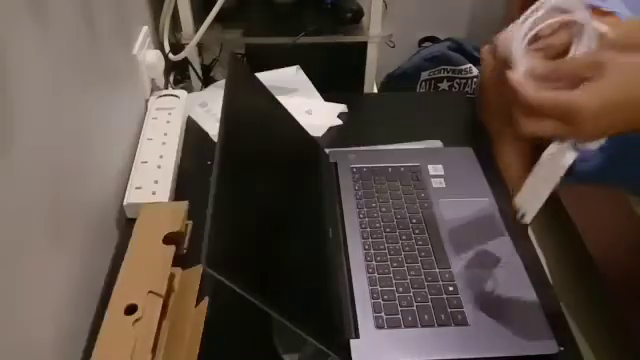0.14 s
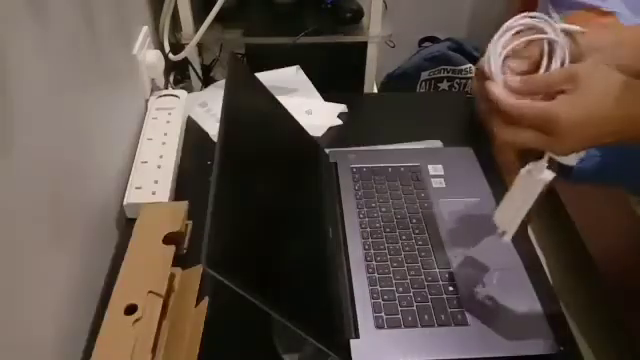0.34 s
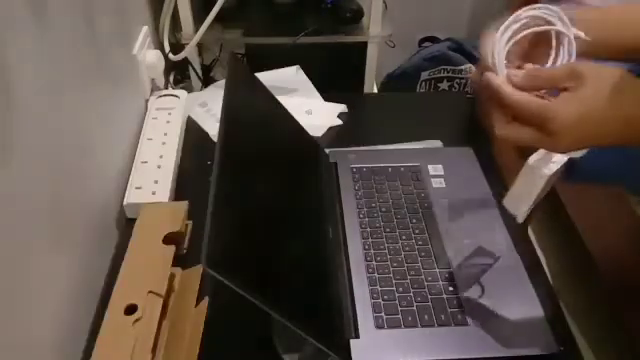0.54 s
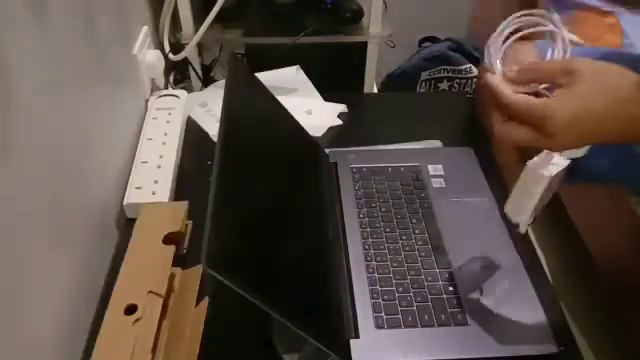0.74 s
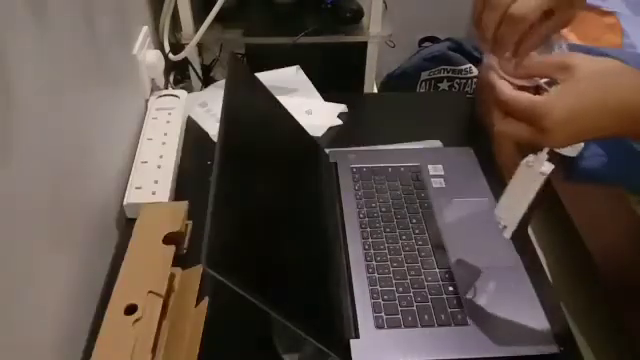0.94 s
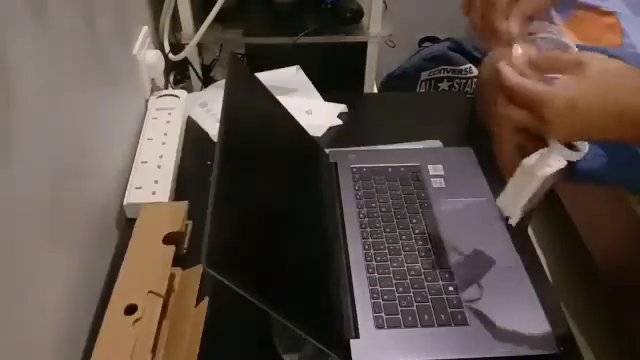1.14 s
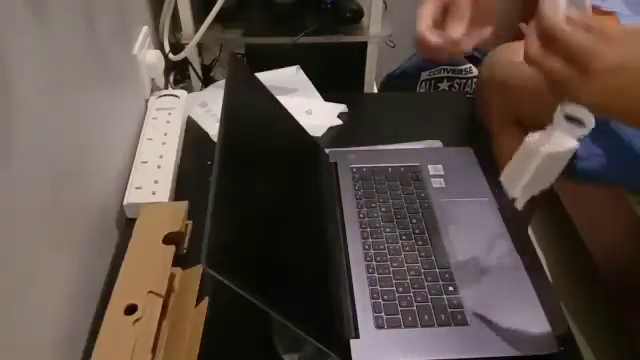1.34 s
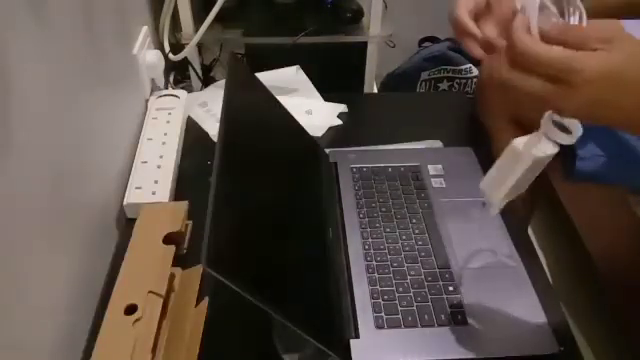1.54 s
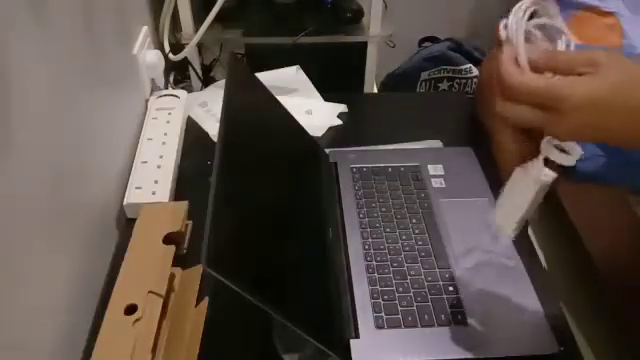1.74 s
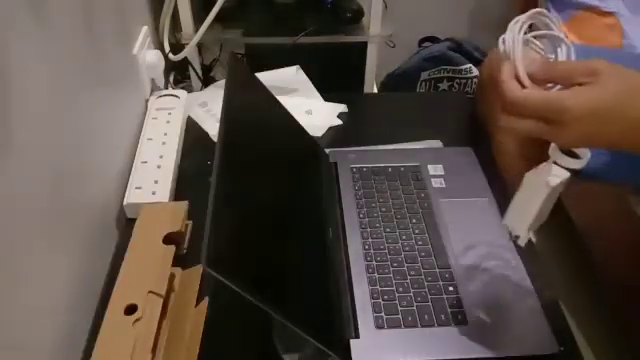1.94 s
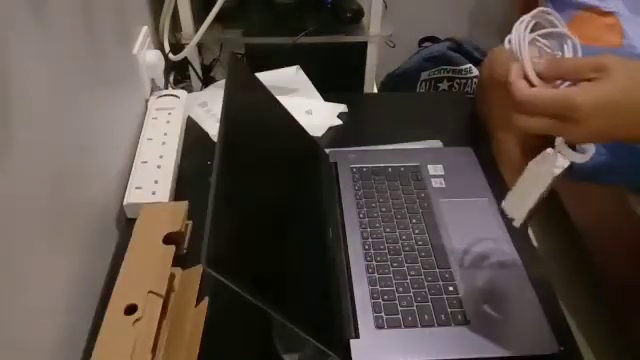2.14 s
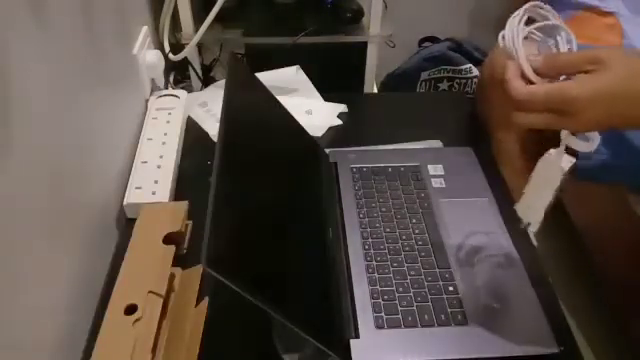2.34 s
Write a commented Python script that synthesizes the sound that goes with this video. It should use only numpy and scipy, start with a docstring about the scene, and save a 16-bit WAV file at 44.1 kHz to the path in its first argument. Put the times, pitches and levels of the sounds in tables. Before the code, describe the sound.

Plastic cord being unwrapped by hand, crackling in short bursts over a faint fan hum.

```python
"""Unwrapping a plastic cord

Hands uncoil a cord in a small room, close to a phone. Its strap and sheath crackle in short bursts of
tiny clicks, with one longer rip as the strap slips. Fingers rustle along the sheath and the charger's
case bumps and rings softly. A fan hums underneath."""
import sys
import numpy as np
from scipy import signal
from scipy.fft import rfft, irfft, next_fast_len
from scipy.io import wavfile
from scipy.ndimage import uniform_filter1d

SR = 44100
rng = np.random.default_rng(int(sys.argv[2]) if len(sys.argv) > 2 else 0)


def unload_audio(sound):
    """Save the sound as a 16-bit wav file, at the path given as the first command line argument."""
    columns = np.transpose(np.atleast_2d(sound))
    # keep every value between -1 and 1, then stretch to whole-number steps
    steps = np.round(np.clip(columns, -1, 1) * 32767)
    wavfile.write(sys.argv[1], SR, steps.astype(np.int16))


N = 110250
FFT_SIZE = next_fast_len(2 * N)
HZ = np.arange(FFT_SIZE // 2 + 1) * SR / FFT_SIZE

# The cord's four EQ bands, low to top: (centre [Hz]) and (width [Hz])
BAND_HZ = [1300, 3300, 6400, 11500]
BAND_WIDTH_HZ = [1500, 2600, 3700, 7300]
# Crackles of strap and sheath: (time [s], relative level [dB], decay time [s],
# opening click against the swarm [dB], four band levels [dB])
CRACKLES = [(0.06, -37.0, 0.0019, -14.0, -17.0, -16.0, -3.0, -4.0),
            (0.2105, -7.8, 0.0016, -4.0, -29.0, -19.0, -6.0, -2.0),
            (0.2195, -4.4, 0.0016, -8.0, -27.0, -18.0, -2.0, -6.0),
            (0.2248, 0.3, 0.0016, -6.0, -32.0, -16.0, -1.0, -8.0),
            (0.2303, -15.6, 0.0012, -20.0, -12.0, -10.0, -3.0, -4.0),
            (0.3992, -1.7, 0.0016, -11.0, -33.0, -23.0, -8.0, -1.0),
            (0.407, -4.8, 0.0022, -20.0, -30.0, -21.0, -6.0, -1.0),
            (0.4183, -12.9, 0.0024, -20.0, -32.0, -17.0, -2.0, -4.0),
            (0.4463, 2.5, 0.0018, -7.0, -19.0, -10.0, -5.0, -3.0),
            (0.4515, 0.5, 0.0015, -17.0, -22.0, -12.0, -8.0, -1.0),
            (0.4549, 1.0, 0.0011, -20.0, -27.0, -10.0, -14.0, -1.0),
            (0.4586, -2.3, 0.0023, -13.0, -30.0, -14.0, -4.0, -3.0),
            (0.4692, -0.6, 0.0017, -12.0, -30.0, -18.0, -9.0, -1.0),
            (0.4815, -10.1, 0.0017, -19.0, -31.0, -17.0, -4.0, -2.0),
            (0.4918, -6.4, 0.0016, -20.0, -38.0, -15.0, -8.0, -1.0),
            (0.5786, -19.0, 0.0007, 0.0, -34.0, -1.0, -9.0, -18.0),
            (0.5905, -13.0, 0.0008, -2.0, -30.0, -7.0, -3.0, -6.0),
            (0.6022, -17.6, 0.0016, -6.0, -27.0, -4.0, -5.0, -5.0),
            (0.6121, -4.0, 0.0013, -18.0, -32.0, -16.0, -1.0, -7.0),
            (0.6154, -7.0, 0.0011, -6.0, -18.0, -7.0, -1.0, -13.0),
            (0.6202, 0.0, 0.0013, -2.0, -6.0, -4.0, -5.0, -14.0),
            (0.6314, -8.9, 0.0025, -16.0, -16.0, -2.0, -5.0, -13.0),
            (0.8436, -14.2, 0.0016, -9.0, -40.0, -17.0, -1.0, -9.0),
            (1.0869, -2.5, 0.0013, -6.0, -25.0, -1.0, -9.0, -11.0),
            (1.0985, -16.4, 0.0013, -9.0, -14.0, -1.0, -9.0, -10.0),
            (1.2117, -14.0, 0.0008, 0.0, -8.0, -2.0, -11.0, -9.0),
            (1.2487, -12.0, 0.002, -14.0, -6.0, -3.0, -10.0, -7.0),
            (1.3049, -21.9, 0.0032, -11.0, -9.0, -4.0, -5.0, -8.0),
            (1.3441, -12.1, 0.0015, -7.0, -15.0, -2.0, -6.0, -13.0),
            (1.3578, -17.8, 0.0029, -16.0, -10.0, -2.0, -8.0, -7.0),
            (1.3683, -12.1, 0.0012, -7.0, -20.0, -4.0, -3.0, -10.0),
            (1.3704, -5.7, 0.0015, -13.0, -7.0, -15.0, -10.0, -2.0),
            (1.3775, -13.5, 0.0035, -15.0, -20.0, -5.0, -3.0, -10.0),
            (1.3839, -15.5, 0.0023, -8.0, -8.0, -8.0, -5.0, -4.0),
            (1.4378, -20.8, 0.0024, -16.0, -7.0, -7.0, -4.0, -8.0),
            (1.4563, -26.1, 0.0023, -13.0, -14.0, -6.0, -3.0, -7.0),
            (1.6731, -22.4, 0.0022, -20.0, -21.0, -6.0, -2.0, -15.0),
            (1.6853, -21.5, 0.0019, -16.0, -11.0, -2.0, -6.0, -18.0),
            (1.6969, -20.0, 0.0015, -11.0, -27.0, -6.0, -3.0, -7.0),
            (1.7572, -34.0, 0.0031, -11.0, -20.0, -5.0, -2.0, -17.0),
            (1.8009, -31.0, 0.0027, -11.0, -31.0, -2.0, -6.0, -8.0),
            (1.8403, -33.2, 0.0033, -20.0, -16.0, -9.0, -1.0, -17.0),
            (1.9015, -38.4, 0.0024, -17.0, -9.0, -9.0, -9.0, -2.0),
            (1.9417, -35.0, 0.002, -16.0, -12.0, -2.0, -9.0, -9.0),
            (2.1319, -36.0, 0.0018, -7.0, -13.0, -9.0, -2.0, -9.0),
            (2.1511, -30.1, 0.0025, -20.0, -12.0, -23.0, 0.0, -22.0),
            (2.1626, -25.3, 0.0027, -20.0, -5.0, -5.0, -6.0, -14.0),
            (2.1760, -27.0, 0.0018, -11.0, -19.0, -7.0, -1.0, -12.0),
            (2.1859, -17.5, 0.0024, -18.0, -12.0, -9.0, -2.0, -9.0),
            (2.2127, -15.9, 0.0026, -13.0, -17.0, -12.0, 0.0, -18.0),
            (2.2198, -21.3, 0.0023, -11.0, -4.0, -4.0, -8.0, -15.0),
            (2.2636, -22.7, 0.0033, -20.0, -17.0, -12.0, -2.0, -5.0),
            (2.2703, -17.1, 0.0022, -18.0, -21.0, -12.0, -1.0, -12.0),
            (2.4398, -22.2, 0.002, -16.0, -15.0, -12.0, -1.0, -8.0),
            (2.4957, -26.2, 0.0025, -12.0, -15.0, -1.0, -8.0, -18.0)]
# Strap rip: (time [s], length [s], opening gain [dB], peak gain [dB], closing gain [dB], slip rate [1/s])
RIPS = [(0.2393, .0305, -1, 5, 3.5, 800)]
# Tone of the rip, low to top: (band level [dB])
RIP_BANDS_DB = [-33.5, -17.5, -11.5, -10]
# Finger strokes along the cord: (time [s], length [s], relative level [dB], four band levels [dB])
STROKES = [(0.589, 0.015, -47, -7, -21, 1, -1), (0.651, 0.052, -56.5, -2, -7, -23, 5),
           (1.258, 0.23, -56.5, 5, 0, -26, -27), (1.348, 0.068, -49, -3, -3.5, -18, -4),
           (1.663, 0.022, -53.5, -5.5, -18, -9.5, -15), (1.696, 0.036, -58.5, -23, 3.5, -1, -18),
           (1.75, 0.039, -56, -26, -8, 3, -24), (1.777, 0.023, -60, -21, -14, 7, -7),
           (1.796, 0.016, -76, -27, 4.5, -22, -14), (1.891, 0.045, -82, -32, -13, -1, -4),
           (1.941, 0.044, -63.5, -26.5, -8, -3.5, -3), (1.97, 0.098, -70, -15, -6.5, -5, -17),
           (2.111, 0.024, -64.5, -11, -11, -0.5, -21), (2.137, 0.043, -54.5, -5, -16, -10, -34),
           (2.172, 0.039, -45.5, -6.5, -9, -2, -11), (2.202, 0.046, -49.5, 2.5, -1, -22, -15),
           (2.23, 0.067, -64, 11.5, -21, -28, -8), (2.431, 0.059, -58.5, -40, -16, 0, -7)]
# Tone of the plastic and the microphone: (frequency [Hz], gain [dB])
CORD_EQ = [(150, -60), (400, -32), (650, -23), (900, -8.5), (1500, -1.5), (2600, 1.5), (3300, 0.5),
           (4200, 2.5), (5200, 4.5), (6000, 2), (6800, 5), (7700, 2.5), (8300, -2), (10000, 4.5),
           (12000, -1.5), (13800, -2), (15000, 6.5), (16000, -14)]
# Bumps, hollow rings and small scrapes of the charger's case:
# (time [s], relative level [dB], pitch [Hz], bandwidth [Hz], T60 of the fade [s])
BUMPS = [(0.099, -53.5, 259, 81, 0.24), (.24, -48.5, 705, 197, 0.2), (.446, -39, 1637, 304, 0.092),
         (0.619, -43, 1251, 90, 0.37), (.622, -43, 2210, 298, 0.29), (.625, -41, 3230, 300, 0.28),
         (0.629, -51, 962, 120, .3), (0.619, -46, 1760, 150, 0.11), (0.941, -52.5, 264, 60.6, 0.16),
         (1.25, -48.5, 2200, 200, 0.22), (1.351, -49, 1245, 118, 0.52), (1.25, -55, 968, 148.8, 0.21),
         (1.366, -47, 485, 122, 0.27), (1.431, -55, 455, 103.1, 0.2), (1.679, -55, 404, 255, 0.13),
         (1.754, -58, 4530, 198, 0.21), (1.752, -56, 6470, 500, 0.2), (1.8, -58, 3380, 200, 0.16),
         (1.799, -60, 2630, 200, 0.14), (2.158, -57, 1248, 88.5, 1), (2.098, -59.5, 439, 81.5, 0.21),
         (2.207, -47, 500, 633, 0.41), (2.208, -49.5, 234, 44.6, 0.19), (2.231, -42, 227, 94, 0.23),
         (2.238, -41, 107.5, 25, 0.18), (2.438, -61.5, 1530, 99.6, 0.22), (2.438, -63, 3330, 150, 0.48)]
# Decay of the small room: (frequency [Hz], T60 [s])
ROOM_T60 = [(500, 0.27), (2000, 0.27), (5500, 0.33), (9000, 0.28), (15000, 0.25)]
# Tone of the fan: (frequency [Hz], relative level [dB])
FAN_SPECTRUM = [(25, -29), (45, -15), (68, -20.5), (85, 4), (125, 3), (155, -7.5), (260, -9.5),
                (400, -12.5), (700, -17), (1100, -19.5), (1200, -15), (1260, -5), (1330, -18), (1800, -23),
                (3000, -27), (5000, -32.5), (8000, -37.5), (13600, -39.5), (15000, -41.5), (16000, -48.5)]
# Tone of the faint stereo hiss: (frequency [Hz], relative level [dB])
HISS_SPECTRUM = [(25, 6.5), (60, -16), (140, -3), (400, -1.5), (1100, -5), (1260, 6.5), (1400, -4.5),
                 (2500, -8.5), (8000, -21), (16000, -26)]

CRACKLE_CLICKS_PER_S, CRACKLE_TRIM_DB = 12000, -1
SLIP_JITTER, SLIP_SCATTER_DB, RIP_HISS_DB, RIP_PEAK_AT = .2, 1.5, -20, .83
STRAP_RING_HZ, STRAP_RING_WIDTH_HZ, STRAP_RING_DB = 6850, 4100, -7
RUSTLE_CLICKS_PER_S, RUSTLE_WAVER_DB, RUSTLE_SPILL_DB = 15000, 3.5, -12
ROOM_DB, ROOM_RISE_S = -4, .0025
FAN_DB, FAN_FLICKER_DB, FAN_FLICKER_HZ, HISS_DB = -58, 2.5, 9, -72.5


def crackles():
    """The plastic gives with one click; a swarm of tiny ones swells and dies away behind it."""
    out, t = np.zeros(N), np.arange(1000) / SR
    for start, db, decay, opening_db, *band_db in CRACKLES:
        swarm = clicks(CRACKLE_CLICKS_PER_S, scatter_db=-1.5, samples=len(t))
        fade = np.exp(-t / decay)
        swarm *= (1 - fade) * fade
        swarm /= np.sqrt(np.sum(swarm ** 2) + 1e-18)
        swarm[0] = undb(opening_db)
        mix_in(out, start, swarm * undb(db + CRACKLE_TRIM_DB), band_db)
    return out


def strap_rip():
    """Nearly regular slips build up and ring the strap, over a hiss of finer tearing."""
    out = np.zeros(N)
    resonance = signal.iirpeak(STRAP_RING_HZ, STRAP_RING_HZ / STRAP_RING_WIDTH_HZ, fs=SR)
    for start, length, first_db, peak_db, last_db, rate in RIPS:
        timing, strength = rng.standard_normal((100, 2)).T
        slip_times = np.cumsum(np.exp(SLIP_JITTER * timing)) / rate
        slip_times -= slip_times[0]
        inside = slip_times < length
        n = int(length * SR) + 1
        rip = undb(RIP_HISS_DB) * rng.standard_normal(SR // 4)[:n]
        rip[(slip_times[inside] * SR).astype(int)] += undb(SLIP_SCATTER_DB * strength[inside])
        rip *= undb(np.interp(np.arange(n) / n, [0, RIP_PEAK_AT, 1], [first_db, peak_db, last_db]))
        ring = signal.lfilter(*resonance, rip)
        mix_in(out, start, rip + undb(STRAP_RING_DB) * ring, RIP_BANDS_DB)
    return out


def finger_rustle():
    """Skin slides on the sheath in dense, faint clicks; each band wavers on its own as a stroke swells."""
    out, t = np.zeros(N), np.arange(SR // 5) / SR
    for start, length, db, *band_db in STROKES:
        swell = np.sin(np.pi / 2 * np.interp(t / length, [0, .3, 1], [0, 1, 0]))
        for band in range(4):
            level = undb(db + RUSTLE_WAVER_DB * waver(steps=30, hold=400, samples=len(t)))
            grains = clicks(RUSTLE_CLICKS_PER_S, scatter_db=1.5, samples=len(t))
            spill_db = RUSTLE_SPILL_DB * np.abs(np.arange(4) - band)
            mix_in(out, start, level * swell * grains, band_db[band] + spill_db)
    return out


def charger_bumps():
    """The case rings dully with a soft attack: a struck tone, roughened by noise in the same resonance."""
    out, t = np.zeros(N), np.arange(SR // 2) / SR
    for start, db, hz, width, t60 in BUMPS:
        edges = [max(hz - width / 2, 20), hz + width / 2]
        resonance = signal.butter(2, edges, "band", fs=SR, output="sos")
        rough = signal.sosfilt(resonance, rng.standard_normal(SR))[-len(t):]
        struck = 1.589 * np.sin(2 * np.pi * hz * t) * np.exp(-t * width / 2)
        attack = 1 - np.exp(-t / (.002 + 1 / hz))  # low notes speak more slowly
        place(out, start, (rough / rough.std() + struck) * attack * undb(db - 60 * t / t60))
    return out


def room_reverb():
    """Spectrum of the room's tail: noise in half-octave bands, each fading at its own pace."""
    t, tail = np.arange(SR // 2) / SR, 0
    white = rfft(rng.standard_normal(len(t)), FFT_SIZE)
    for hz in 300 * 2 ** (np.arange(13) / 2):
        weight = np.clip(1 - np.abs(2 * np.log2((HZ + 1) / hz)), 0, 1)
        band = irfft(white * weight, FFT_SIZE)[:len(t)]
        tail += band * undb(-60 * t / curve(ROOM_T60, hz))
    tail *= 1 - np.exp(-t / ROOM_RISE_S)
    return rfft(tail / np.sqrt(np.sum(tail ** 2)), FFT_SIZE)


def fan():
    """A low hum whose level wavers, under a steady rush of air."""
    flicker = waver(steps=200, hold=int(SR / FAN_FLICKER_HZ), samples=N)
    air = noise(FAN_SPECTRUM, FAN_DB)
    hum = signal.sosfiltfilt(signal.butter(2, 300, fs=SR, output="sos"), air)
    return air - hum + hum * undb(FAN_FLICKER_DB * flicker)


def undb(db):
    """Decibels to amplitude."""
    return 10 ** (np.asarray(db, float) / 20)


def curve(table, hz=HZ):
    """A table of (frequency [Hz], value) read along a log frequency axis."""
    freqs, values = np.array(table, float).T
    return np.interp(np.log(hz + 1), np.log(freqs), values)


def minimum_phase(gain):
    """Spectrum of an EQ with this gain and no pre-ring, so clicks stay crisp."""
    cepstrum = irfft(np.log(gain + 1e-5))
    cepstrum[1:len(cepstrum) // 2] *= 2
    cepstrum[len(cepstrum) // 2 + 1:] = 0
    return np.exp(rfft(cepstrum))


def clicks(per_s, scatter_db, samples):
    """Random clicks of either sign and scattered size, rms 1."""
    chance, polarity, size = rng.random((samples, 3)).T
    x = (chance < per_s / SR) * np.sign(polarity - .5) * undb(-scatter_db * np.log(size + 1e-9))
    return x / np.sqrt(np.mean(x ** 2) + 1e-18)


def waver(steps, hold, samples):
    """A drift that glides to a new random value every `hold` samples."""
    return uniform_filter1d(np.repeat(rng.standard_normal(steps), hold)[:samples], hold)


def noise(spectrum, rms_db):
    """A steady bed of coloured noise."""
    x = irfft(rfft(rng.standard_normal(FFT_SIZE)) * undb(curve(spectrum)), FFT_SIZE)[:N]
    return x * undb(rms_db) / np.sqrt(np.mean(x ** 2))


def place(out, start, x):
    """Lays x on the track at `start` seconds."""
    at = int(start * SR)
    out[at:at + len(x)] += x[:N - at]


def mix_in(out, start, x, band_db):
    """Shapes x by the energy in the four bands and lays it on the track."""
    density_db = np.array(band_db) - 10 * np.log10(np.array(BAND_WIDTH_HZ) * 2 / SR)
    gain = undb(curve(list(zip(BAND_HZ, density_db)), np.arange(257) * SR / 512))
    place(out, start, signal.fftconvolve(x, irfft(minimum_phase(gain))))


def scene():
    """Cord, room tail, dry bumps and fan sit in the centre; a faint hiss adds width."""
    handling = crackles() + strap_rip() + finger_rustle()
    cord = rfft(handling, FFT_SIZE) * minimum_phase(undb(curve(CORD_EQ)))
    cord_in_room = irfft(cord * (1 + undb(ROOM_DB) * room_reverb()), FFT_SIZE)[:N]
    mid = cord_in_room + charger_bumps() + fan()
    side = noise(HISS_SPECTRUM, HISS_DB)
    return np.array([mid + side, mid - side])


def record(dry):
    """The phone rounds the loudest peaks and cuts the top end."""
    rounded = dry / (1 + np.abs(dry) ** 4) ** (1 / 4)
    high_cut = signal.ellip(7, .2, 60, 15500, fs=SR, output="sos")
    return .95 * signal.sosfilt(high_cut, rounded)


dry = scene()
out = record(dry)
unload_audio(out)
```